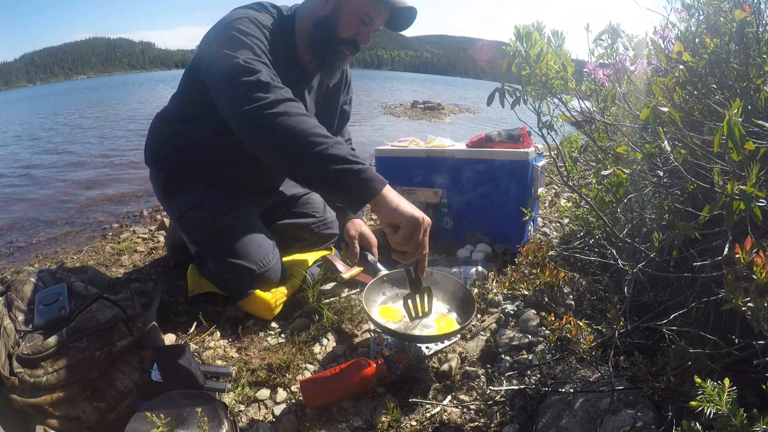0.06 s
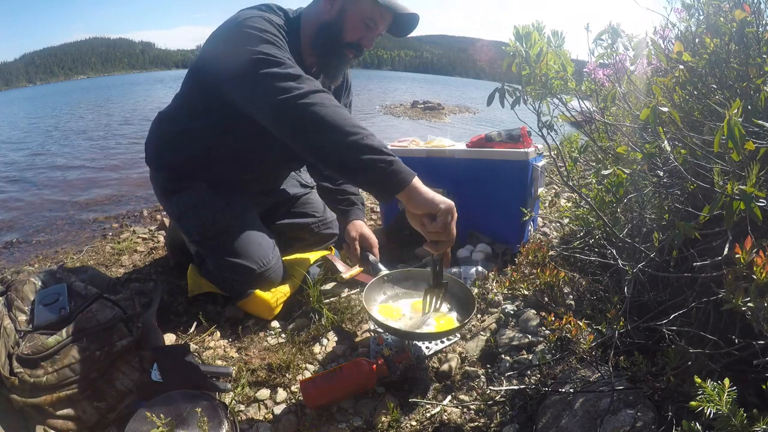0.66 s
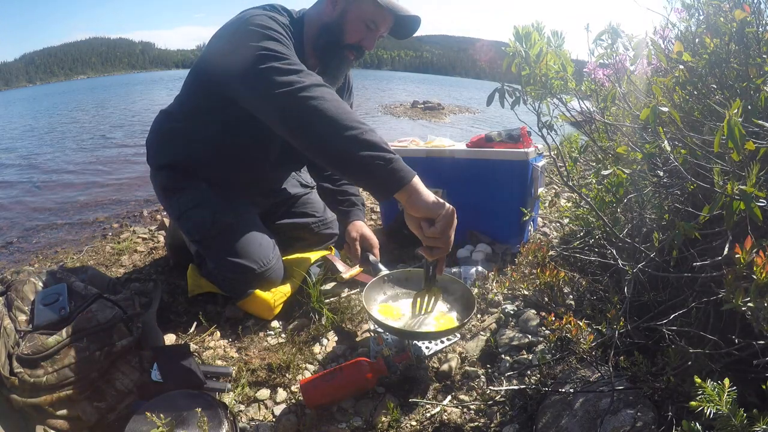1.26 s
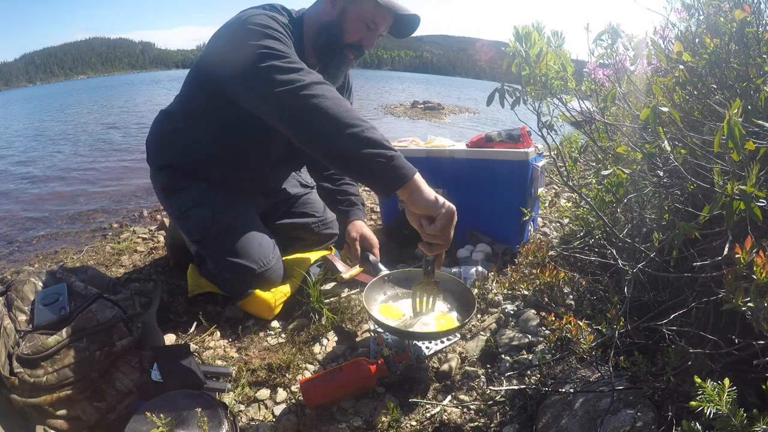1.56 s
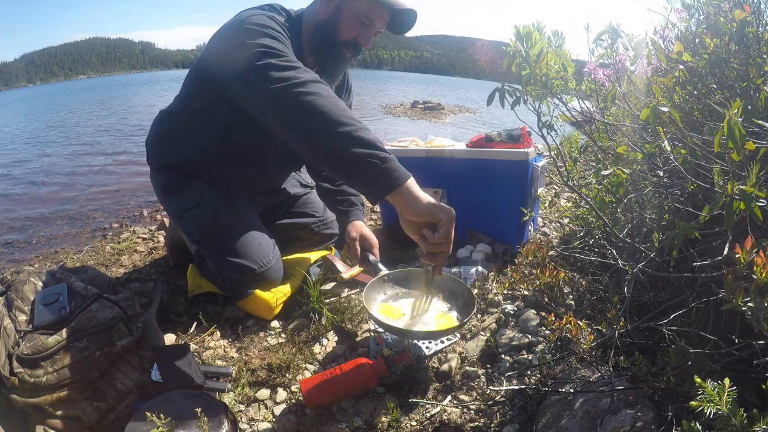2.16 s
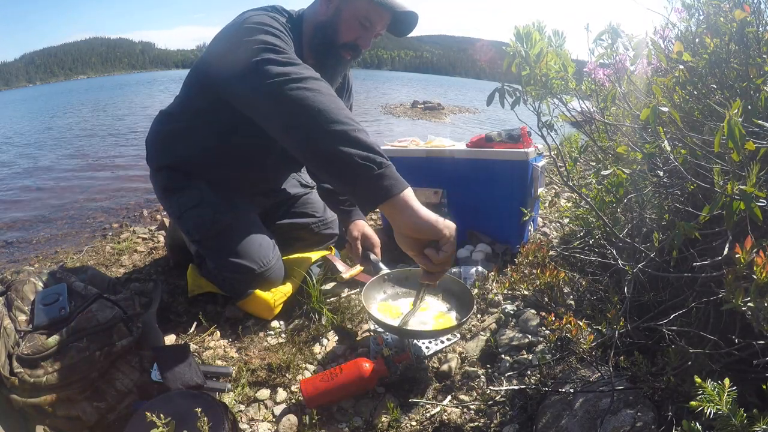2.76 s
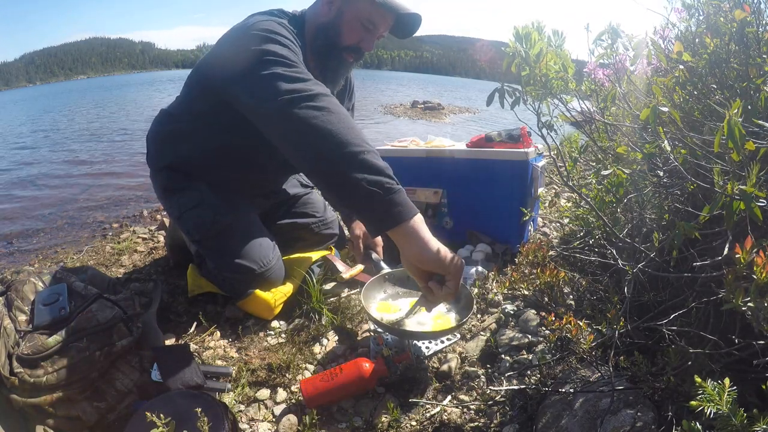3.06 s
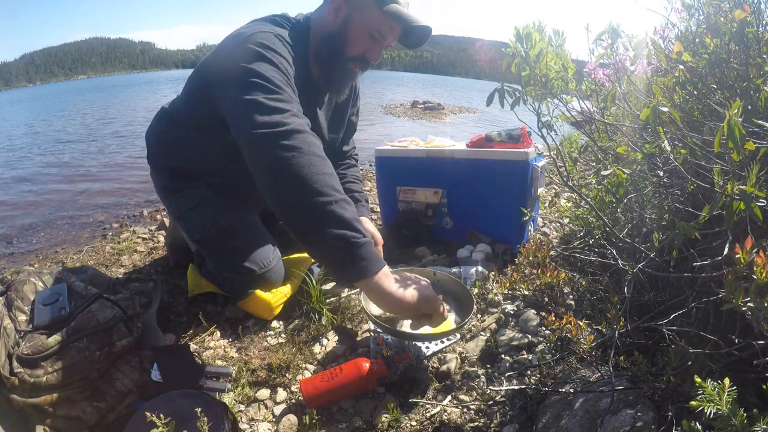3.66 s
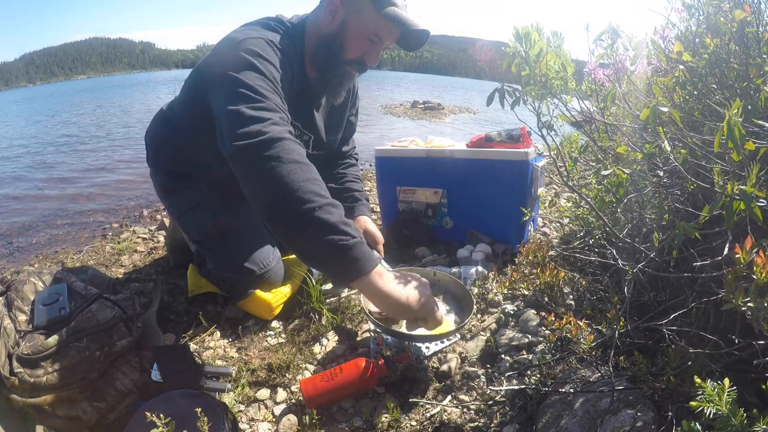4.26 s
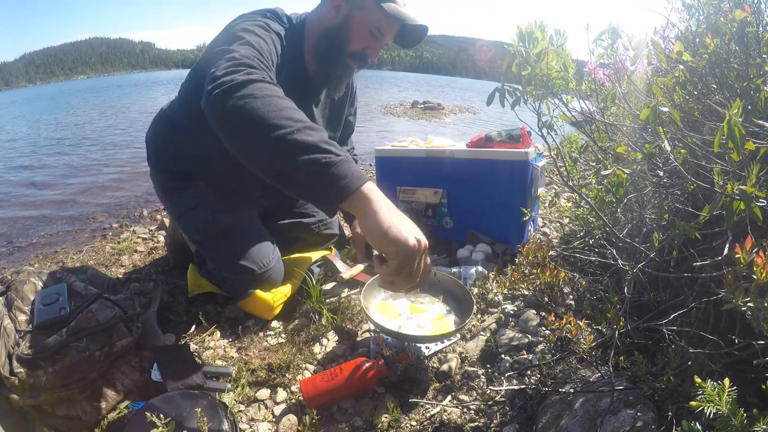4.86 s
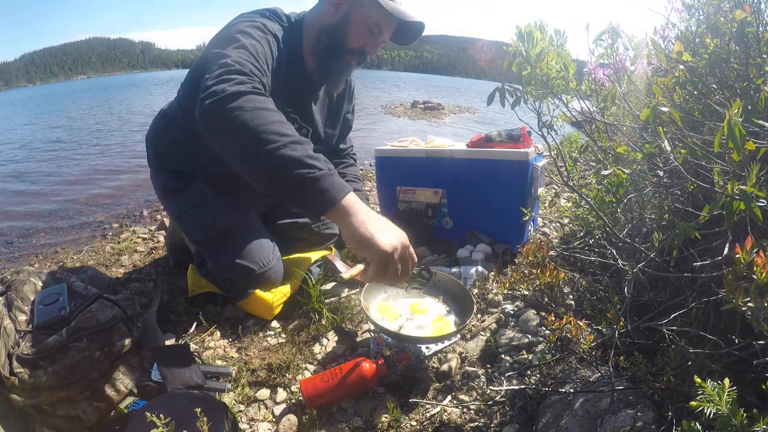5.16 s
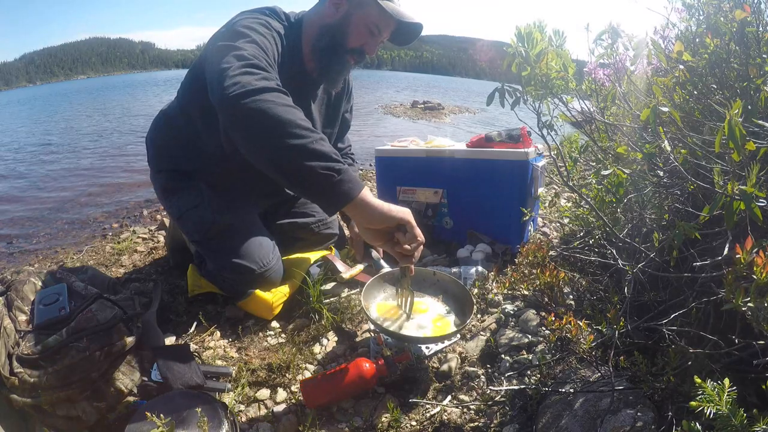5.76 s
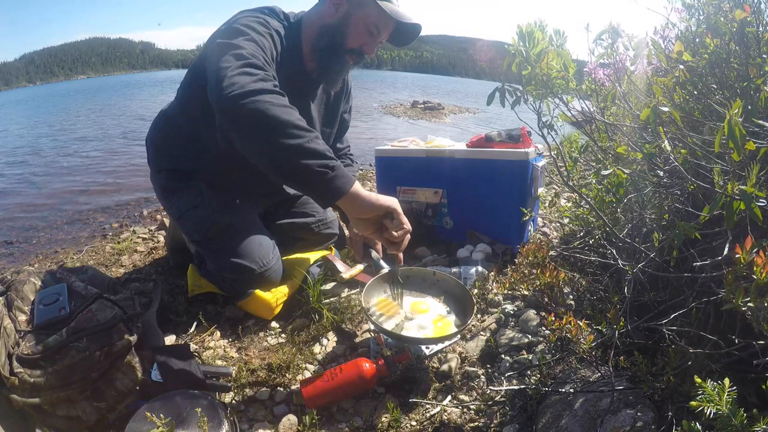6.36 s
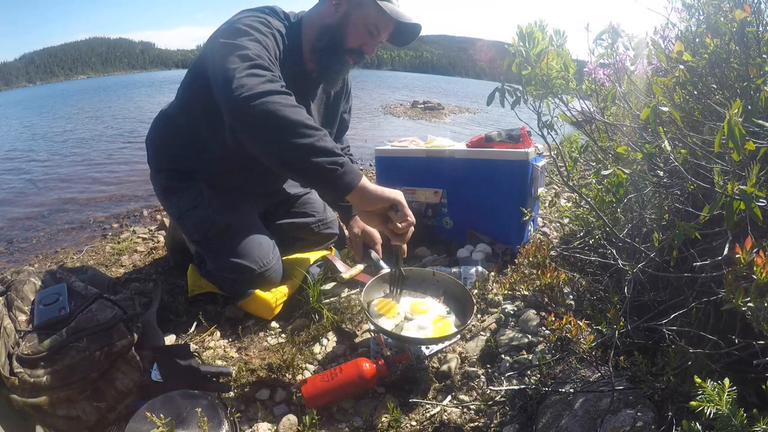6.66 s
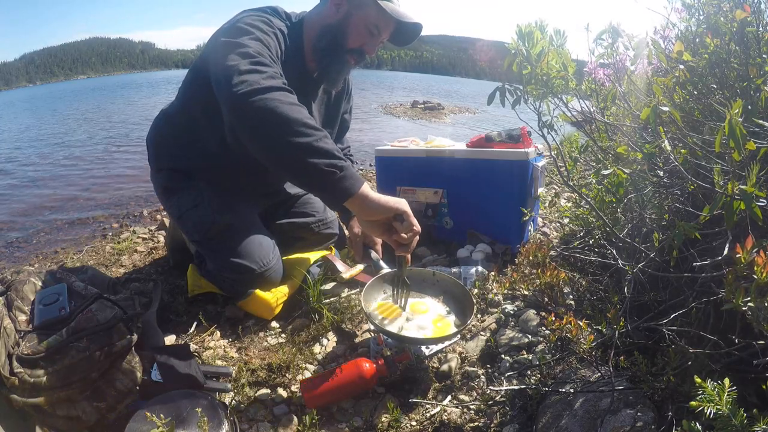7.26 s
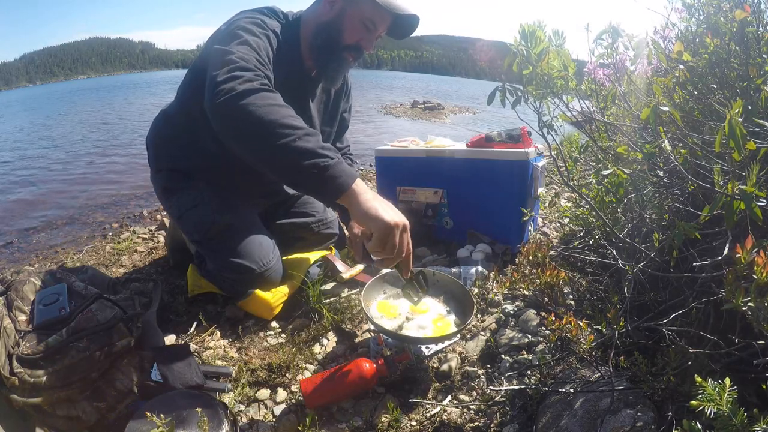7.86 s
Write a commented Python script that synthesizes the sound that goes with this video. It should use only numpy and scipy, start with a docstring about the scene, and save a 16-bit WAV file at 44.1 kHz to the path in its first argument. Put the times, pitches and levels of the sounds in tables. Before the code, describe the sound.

Eggs fry in a metal pan on a gas camp stove outdoors, heard from about a step away. A bright, continuous sizzle is dotted with sharp pops and spits of fat, over the soft low roar of the burner. A spatula lightly taps and scrapes the pan, then pushes the wet eggs around midway. The popping grows busier toward the end, as a faint breeze nudges the microphone.

```python
"""A bright sizzle is heard first: eggs fry in a metal pan on a camp stove on a stony lake shore.
Countless small bubbles burst in the fat and merge into noise; larger ones pop or spit, and the stones
scatter each pop. The sizzle swells as a spatula works the eggs, rubbing by stick-slip friction and
knocking on the pan. Underneath, the burner's turbulent flame roars low and hisses, and eddies of a
breeze nudge the microphone, a step from the stove."""
import sys
import numpy as np
from scipy import signal
from scipy.fft import rfft, irfft
from scipy.io import wavfile
from scipy.ndimage import uniform_filter1d

SR = 44100
rng = np.random.default_rng(int(sys.argv[2]) if len(sys.argv) > 2 else 0)


def wav_record(signal):
    """Record a signal, one row per channel, as 16-bit PCM in the file named by sys.argv[1]."""
    frames = np.transpose(np.atleast_2d(signal))
    bounded = np.clip(frames, -1, 1)
    # unit amplitude maps onto the largest positive 16-bit level
    quanta = np.round(bounded * 32767).astype(np.int16)
    wavfile.write(sys.argv[1], SR, quanta)


N = 352888
TIME = np.arange(N) / SR
HZ = np.fft.rfftfreq(N, 1 / SR)
MILLISECOND = np.sqrt(SR / 1000)  # gives a unit-energy click the energy of 1 ms at an rms of 1


def gain_of(db):
    """The decibel scale: 20 dB is a tenfold amplitude."""
    return 10 ** (np.asarray(db) / 20)


def unit_rms(x):
    """Power normalisation to an rms of 1."""
    return x / np.sqrt(np.mean(x ** 2) + 1e-20)


def unit_energy(x):
    """Energy normalisation: the squared samples sum to 1."""
    return x / np.linalg.norm(x)


def level_at(spectrum, hz):
    """Interpolation of a spectrum on a logarithmic frequency axis."""
    frequencies, levels = np.transpose(spectrum)
    return np.interp(np.log(hz + 1), np.log(frequencies + 1), levels)


def coloured(x, spectrum):
    """Spectral shaping of a whole track, returned at an rms of 1."""
    return unit_rms(irfft(rfft(x) * gain_of(level_at(spectrum, HZ)), N))


def add(mix, start_s, sound):
    """Superposition: a sound adds to the mix from its onset."""
    part = mix[max(round(start_s * SR), 0):][:len(sound)]
    part += sound[:len(part)]


def drift(cutoff_hz):
    """Low-pass noise: a slow random fluctuation of rms 1."""
    return unit_rms(irfft(rfft(rng.standard_normal(N)) / (1 + (HZ / cutoff_hz) ** 4), N))


def hump(peak_s, length_s):
    """A raised-cosine envelope: a smooth rise to 1 and fall."""
    return np.cos(np.pi * np.clip((TIME - peak_s) / length_s, -.5, .5)) ** 2


def held(start_s, end_s, ramp_share=0.36):
    """A tapered envelope: it rises to 1, holds and falls."""
    out = np.zeros(N)
    add(out, start_s, signal.windows.tukey(round((end_s - start_s) * SR), ramp_share))
    return out


# Wind pressure spectrum: (frequency [Hz], level [dB])
WIND_SPECTRUM = [(5, -3), (14, 2), (26, 6.5), (45, 4), (70, -7), (130, -27), (400, -73)]
# Gusts: (peak time [s], duration [s], level [dB])
WIND_GUSTS = [(2.9, .6, -54.5), (6.217, .14, -49), (6.382, 0.27, -48), (7.536, .14, -51),
              (7.92, 0.42, -44.5)]


def breeze(air_db=-56.8, lull_db=1.4, buffet_db=2):
    """Turbulent pressure fluctuation: eddies press on the microphone, harder in gusts."""
    air = gain_of(air_db + lull_db * drift(6.3))
    gusts = sum(gain_of(db) * hump(s, length) for s, length, db in WIND_GUSTS)
    buffeting = gain_of(buffet_db * drift(18))
    return (air + gusts) * buffeting * coloured(rng.standard_normal(N), WIND_SPECTRUM)


# Spectrum of the flame under the pan: (frequency [Hz], level [dB])
FLAME_SPECTRUM = [(20, -16), (65, -1.5), (105, 1.5), (150, -1.5), (230, -4.5), (320, -5), (425, 0),
                  (500, -2.5), (610, -6), (700, -16), (820, -16), (950, -25.5), (1400, -26.5), (4000, -36)]


def burner(level_db=-49, flutter_db=0.73):
    """Combustion noise: the turbulent flame roars through the hollow under the pan."""
    return gain_of(level_db + flutter_db * drift(19)) * coloured(rng.standard_normal(N), FLAME_SPECTRUM)


def scatter(x, near_db=-5, far_db=-12, near_t60_s=0.026, far_t60_s=0.046):
    """Diffuse reflection: pan wall and stones return brief echoes, the shore a faint longer tail."""
    t = np.arange(SR // 8) / SR
    near, far = rng.standard_normal((2, len(t))) * (t > .0006)
    response = gain_of(near_db) * unit_energy(near * gain_of(-60 * t / near_t60_s))
    response += gain_of(far_db) * unit_energy(far * gain_of(-60 * t / far_t60_s))
    response[0] = 1  # direct sound
    return signal.oaconvolve(x, response)


# Faint resonances of pan and burner: (frequency [Hz], bandwidth [Hz], boost [dB])
PAN_MODES = [(1190, 70, 2.5), (1600, 450, 1.5), (3188, 120, 2), (3429, 65, 2), (4968, 45, 4),
             (5580, 350, 2), (6650, 220, 2), (7126, 60, 2.5), (7378, 40, 4), (9950, 400, 1.5)]


def pan_ring(x):
    """Resonance: the metal lifts a few narrow bands."""
    lift_db = sum(db / (1 + (2 * (HZ - hz) / width) ** 2) for hz, width, db in PAN_MODES)
    return irfft(rfft(x) * gain_of(lift_db), N)


# Strokes along the pan: (start [s], end [s], level [dB])
SPATULA_STROKES = [(0.657, 0.974, -72), (3.076, 3.53, -61.5), (6.037, 6.496, -66), (6.863, 7.085, -59),
                   (7.55, 7.994, -78)]
# Resonances of the blade: (frequency [Hz], bandwidth [Hz], level [dB])
BLADE_MODES = [(2540, 150, 0), (2880, 220, -1), (3250, 240, -3), (3680, 280, -2), (4400, 600, -10)]


def spatula_rub(slips_per_s=700, grit_db=5.0):
    """Stick-slip friction: random slips over the pan excite the blade's resonances."""
    pressure = sum(gain_of(db) * held(start, end) for start, end, db in SPATULA_STROKES)
    slipping = rng.random(N) < slips_per_s / SR
    slips = slipping * gain_of(grit_db * np.minimum(rng.exponential(1, N), 4))
    blade = sum(gain_of(db) / (1 + 1j * hz / width * (HZ / hz - hz / (HZ + 1)))
                for hz, width, db in BLADE_MODES)
    return unit_rms(irfft(rfft(slips) * blade, N)) * pressure


# Hollow knocks: (time [s], level [dB], duration [s], lowest mode [Hz], gain of upper modes [dB])
SPATULA_KNOCKS = [(.177, -41, .002, 1750, -8), (2.575, -42.5, .003, 1690, -15),
                  (2.7365, -42.5, .0061, 1690, 4.5), (3.1996, -46, .009, 3100, -22),
                  (4.3156, -41, .002, 1410, -17)]
# Modes of a knock: (frequency ratio [1], level [dB], time to decay by 60 dB [s])
IMPACT_MODES = [(1, 0, .012), (1.6, -2, .012), (2.1, -12, .012)]


def spatula_knocks(contacts=5):
    """Impact excitation: the blade chatters on the pan, and each contact starts damped modes."""
    out = np.zeros(N)
    t = np.arange(SR // 25) / SR
    for s, db, length, hz, upper_db in SPATULA_KNOCKS:
        ring = sum(gain_of(level + upper_db * (ratio > 1) - 60 * t / t60)
                   * np.sin(2 * np.pi * hz * ratio * t) for ratio, level, t60 in IMPACT_MODES)
        knock = np.zeros(len(t))
        for progress in (np.arange(contacts) + rng.random(contacts)) / contacts:
            add(knock, progress * length, rng.uniform(0.16, 1) * ring)
        add(out, s, gain_of(db) * np.sqrt(length * SR) * unit_energy(knock))
    return scatter(out, near_db=-12)[:N]


def snap(centre_hz, spectrum, focus_db, ripple_db=3, size=512):
    """Impulsive rupture: a bubble's unit-energy click, weighted toward the pitch its size sets."""
    hz = np.fft.rfftfreq(size, 1 / SR)
    octaves = np.log2((hz + 100) / centre_hz)
    ripple = unit_rms(uniform_filter1d(rng.standard_normal(len(hz)), size=9))
    db = level_at(spectrum, hz) - focus_db * np.minimum(octaves ** 2, 4) + ripple_db * ripple
    # minimum phase packs the energy at the onset
    cepstrum = irfft(np.log(gain_of(db)))
    cepstrum[1:size // 2] *= 2
    cepstrum[size // 2 + 1:] = 0
    return unit_energy(irfft(np.exp(rfft(cepstrum))))


def blip(hz, decay_cycles=1.6):
    """Damped oscillation: a tiny bubble rings briefly at its own pitch."""
    cycles = hz * np.arange(SR // 100) / SR
    return unit_energy(np.sin(2 * np.pi * cycles) * np.exp(-cycles / decay_cycles) * (1 - np.exp(-cycles)))


def random_times(per_s):
    """A Poisson process: independent events at a steady or changing rate."""
    return TIME[rng.random(N) < per_s / SR]


def ticks(per_s=2.5, level_db=-49.5, spread_db=2, low_hz=4670, high_hz=14000):
    """Heavy damping: the smallest droplets burst with a thin, high tick."""
    out = np.zeros(N)
    for s in random_times(per_s):
        hz = low_hz * (high_hz / low_hz) ** rng.random()
        gain = gain_of(level_db + spread_db * rng.standard_normal()) * MILLISECOND
        add(out, s, gain * scatter(blip(hz, decay_cycles=0.4), near_db=0.5))
    return out


# Vigour of the boiling fat: (time [s], level above a simmer [dB])
BOIL_CURVE = [(0, -2), (.7, 1), (1.0, 0), (1.8, .3), (2.4, -2.5), (2.94, -0.84), (3.56, 1.5), (4.25, -0.1),
              (4.45, -1.7), (4.81, 0.64), (5.1, -1), (5.7, -1), (5.95, 1.5), (6.3, 1.5), (6.9, 2.4),
              (7.45, 1.2), (7.72, 3), (8.0, 2)]


def boil_db():
    """Amplitude envelope of the frying: how hard the fat boils at each moment."""
    return np.interp(TIME, *np.transpose(BOIL_CURVE))


def crackle(per_s=1500, spread_db=5, range_db=22, clumping=.45, ringing_above_hz=3800, bands=36):
    """Shot noise: bubbles of many sizes burst at random, in loose clumps."""
    chance = per_s / bands / SR * np.exp(clumping * drift(25))
    strengths = gain_of(rng.exponential(spread_db, N) % range_db)  # loud bursts are rare
    out = np.zeros(N)
    for k, centre_hz in enumerate(np.geomspace(1700, 15000, bands)):
        onsets = np.flatnonzero(rng.random(N) < chance)
        bursts = np.zeros(N)
        bursts[onsets] = strengths[(onsets + k * N // bands) % N]
        # large bubbles only crack; half of the small ones ring
        crack = snap(centre_hz, [(20, 0), (20000, 0)], focus_db=6)
        grain = blip(centre_hz) if k % 2 and centre_hz > ringing_above_hz else crack
        out += signal.oaconvolve(bursts, scatter(grain))[:N]
    # whitening lets each family of bubbles take its own spectrum
    spectrum = rfft(out)
    mean_power = uniform_filter1d(abs(spectrum) ** 2, size=2001)
    return unit_rms(irfft(spectrum / np.sqrt(mean_power + 1e-9), N))


STIR_SPAN_S = (3.42, 4.45)  # the spatula pushes wet egg over hot metal, which bubbles and sprays
# Spectra of slow bubbles, small bubbles, fine spray and wet egg: (frequency [Hz], level [dB])
SLOW_SPECTRUM = [(500, -33), (950, -0.5), (1350, 0.5), (1700, 0), (2100, -5.5), (2800, -14), (5000, -50)]
SMALL_SPECTRUM = [(1200, -52), (2100, -10.5), (2500, -0.5), (3300, -0.5), (4300, 1), (5300, 4.5), (5750, 3),
                  (6200, -1.5), (6650, 2), (7000, -4), (7600, -15.5), (9500, -47), (14000, -61)]
SPRAY_SPECTRUM = [(4000, -22), (7000, -3.5), (8000, 1.5), (9000, -3), (10000, -1.5), (12700, -4.5),
                  (13600, 2), (15300, -6), (17000, -5.5)]
WET_SPECTRUM = [(700, -39), (1200, -3), (1650, 5), (2100, -6), (2800, -15), (5000, -40)]


def sizzle(slow_db=-71.5, small_db=-60.5, spray_db=-68, wet_db=-67):
    """Modulated noise: crackle over a hiss of steam and gas follows the boil and the stir."""
    boil = boil_db()
    stir = held(*STIR_SPAN_S, ramp_share=0.6)
    # (spectrum, envelope, hiss relative to crackle [dB])
    families = [(SLOW_SPECTRUM, gain_of(slow_db + 1.9 * boil), -6),
                (SMALL_SPECTRUM, gain_of(small_db + boil), -2),
                (SPRAY_SPECTRUM, gain_of(spray_db + 1.5 * boil + 2.5 * stir), -3),
                (WET_SPECTRUM, gain_of(wet_db) * stir, -5)]
    grains = crackle()
    return sum(envelope * coloured(grains + gain_of(hiss_db) * rng.standard_normal(N), spectrum)
               for spectrum, envelope, hiss_db in families)


# Spectrum of a large bursting bubble: (frequency [Hz], level [dB])
POP_SPECTRUM = [(100, -51), (700, 2.5), (1100, 4), (1550, 5), (2080, -0.5), (2500, 5), (4300, 3.5),
                (5300, 7), (6100, 3), (6700, 2.5), (8000, -7), (12500, -9.5), (14000, -11), (20000, -17)]


def pop(centre_hz, focus_db=2.5, pivot_hz=4400):
    """Size scaling: the smaller the bubble, the more its crack leans to the treble."""
    db_per_octave = 4 * np.log2(centre_hz / pivot_hz)
    tilted = [(hz, db + db_per_octave * np.log2(hz / pivot_hz)) for hz, db in POP_SPECTRUM]
    return snap(centre_hz, tilted, focus_db, ripple_db=4.0)


# Steam pockets tearing open: (time [s], level [dB], duration [s], centre [Hz], puff level [dB])
STEAM_SPITS = [(.167, -46, 0.0036, 4800, -67), (0.173, -35, .016, 4200, -54),
               (0.185, -41.5, 0.016, 4200, -53), (1.661, -46.5, 0.01, 3760, -72),
               (1.9333, -46.5, 0.0077, 4500, -43.5), (2.5738, -40.5, .014, 4030, -44.5),
               (2.7328, -47, .011, 5010, -45.5), (3.197, -49.5, 0.016, 3430, -46.5)]


def spits(rise_octaves=1.26, puff_hz=105, puff_decay_s=0.0025, fizz_db=-12, bursts=48):
    """Pressure release: a puff of steam, a volley that brightens as the hole closes, a late fizz."""
    out = np.zeros(N)
    t = np.arange(SR // 40) / SR
    puff = unit_rms(t * np.exp(-t / puff_decay_s) * np.sin(2 * np.pi * puff_hz * t))
    for s, db, length, centre_hz, puff_db in STEAM_SPITS:
        volley, spray = np.zeros((2, SR // 20))
        droplet = snap(12000, SPRAY_SPECTRUM, focus_db=7.0)
        for progress in (np.arange(bursts) + rng.random(bursts)) / bursts:
            strength = np.sqrt(progress) * (1 - progress) * rng.choice([-1, 1]) * rng.uniform(0.47, 1)
            hz = centre_hz * 2 ** (rise_octaves * (progress - 1 / 3))
            add(volley, progress * length, strength * pop(hz, focus_db=4.0))
            add(spray, (progress + 1 / 4) * length, strength * rng.standard_normal() * droplet)
        spit = unit_energy(volley) + gain_of(fizz_db) * unit_energy(spray)
        add(out, s, gain_of(db) * np.sqrt(length * SR) * scatter(spit, near_db=-14, far_db=-16))
        add(out, s, gain_of(puff_db) * puff)
    return out


def lesser_pops(simmer_per_s=6.5, worked_per_s=20, simmer_db=-46, typical_hz=4200, fizz_db=-11):
    """Rate modulation: random rows like LOUD_POPS, more frequent as the fat boils or is worked."""
    boil = boil_db()
    worked = sum(held(start, end) for start, end, _ in SPATULA_STROKES) + held(*STIR_SPAN_S)
    times = random_times((simmer_per_s + worked_per_s * worked) * gain_of(1.6 * boil))
    level_jitter, pitch_jitter, fizz_jitter = np.clip(rng.standard_normal((len(times), 3)), -2, 2).T
    db = simmer_db + np.interp(times, TIME, boil) + 0.9 * level_jitter
    centre_hz = typical_hz * 2 ** (0.34 * pitch_jitter)
    return list(zip(times, db, centre_hz, db + fizz_db + 3 * fizz_jitter))


# Loud pops of fat: (time [s], crack level before trim [dB], centre [Hz], droplet level [dB])
LOUD_POPS = [(.387, -39, 4960, -60), (.7361, -39, 3970, -53), (0.7605, -34, 4380, -52),
             (1.011, -40, 4400, -49), (1.2326, -37.5, 5270, -51), (1.428, -28.5, 6500, -37),
             (1.5672, -43, 4300, -50), (1.6585, -34.5, 6600, -41), (1.8277, -42, 5100, -47),
             (1.8794, -43.5, 6100, -47), (2.37, -40, 4440, -52), (3.082, -36.5, 3440, -46),
             (3.5485, -40, 3148, -50), (3.6853, -39.5, 4520, -52), (3.8256, -38, 2700, -48),
             (3.8824, -37.5, 3380, -50), (4.039, -36.5, 4400, -40), (4.0823, -36, 3870, -39),
             (4.1875, -39.5, 5900, -48), (4.227, -42, 2620, -54), (4.2768, -38, 4800, -45),
             (4.6578, -39.5, 2800, -45.5), (5.2628, -40.5, 6600, -46), (5.6309, -38.5, 5900, -47),
             (5.9853, -42.5, 5890, -56), (6.1943, -40, 4200, -46), (6.2868, -44.5, 2860, -56),
             (6.383, -45, 3580, -62), (6.439, -44, 4100, -51), (6.6289, -30.5, 3500, -47),
             (6.7127, -35.5, 3030, -48), (6.746, -34.5, 4130, -44), (6.969, -31, 3164, -50),
             (6.9977, -36, 3600, -52), (7.004, -35, 3330, -49), (7.0154, -35, 3640, -51),
             (7.1863, -31, 5000, -48), (7.2193, -39, 4000, -54), (7.5532, -34.5, 4200, -41),
             (7.5832, -26.5, 4800, -47), (7.6542, -36.5, 4200, -59), (7.7713, -40, 4200, -52),
             (7.7932, -41, 3600, -51), (7.849, -39.5, 5460, -43), (7.942, -34.5, 3600, -54),
             (7.9593, -38, 4360, -56)]


def pops(trim_db=-1.0, rebound=0.24, needle_db=-5, fizz_t60_s=0.046):
    """Rupture and reflection: each pop cracks, rebounds off the pan wall and throws fine droplets."""
    out = np.zeros(N)
    t = np.arange(SR // 25) / SR
    for s, db, centre_hz, droplets_db in LOUD_POPS + lesser_pops():
        crack = gain_of(db + trim_db) * MILLISECOND * pop(centre_hz)
        add(out, s, scatter(crack, near_db=-10.5))
        add(out, s + rng.uniform(.0004, 0.0011), rebound * crack)
        # the film tears with a needle-sharp tick, then its droplets land
        needle = snap(12300, SPRAY_SPECTRUM, focus_db=3.0, ripple_db=2.5)
        landings = rng.standard_normal(len(t)) * gain_of(-60 * t / fizz_t60_s)
        fizz = unit_energy(signal.fftconvolve(landings, needle))
        add(out, s, gain_of(droplets_db + needle_db) * MILLISECOND * needle)
        add(out, s, gain_of(droplets_db) * MILLISECOND * fizz)
    return out


def scene():
    """Superposition of stove, breeze and resonant pan at one microphone."""
    background = burner() + breeze()
    frying = sizzle() + pops() + ticks() + spits() + spatula_rub() + spatula_knocks()
    return (background + pan_ring(frying))[None]


def record(dry, cutoff_hz=15420):
    """Band limiting: a low-pass filter removes the highest treble."""
    lowpass = signal.firwin(511, cutoff_hz, window=("kaiser", 8), fs=SR)
    return signal.oaconvolve(dry, lowpass[None], "same")


dry = scene()
out = record(dry)
wav_record(out)
```